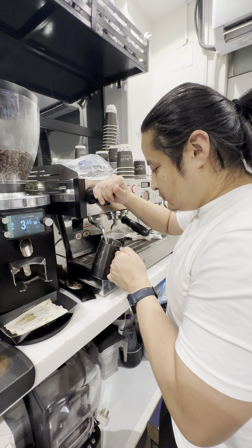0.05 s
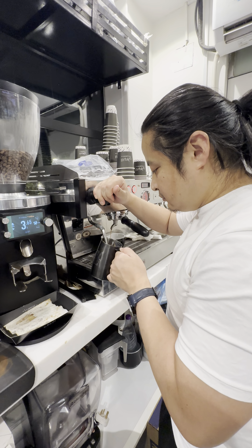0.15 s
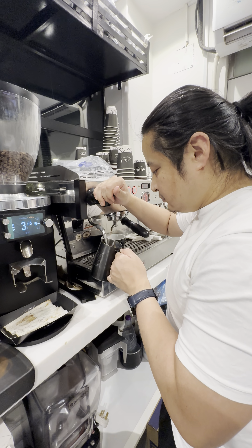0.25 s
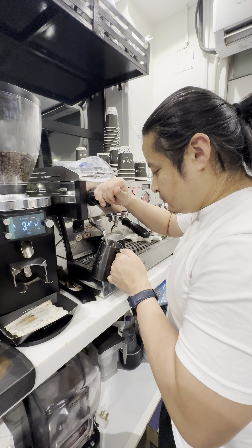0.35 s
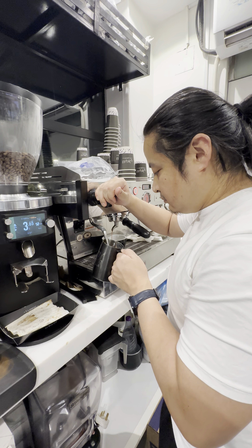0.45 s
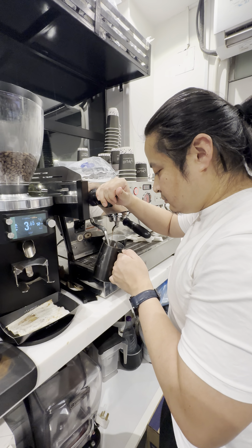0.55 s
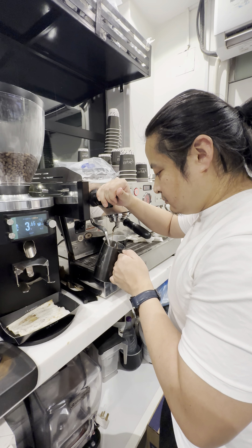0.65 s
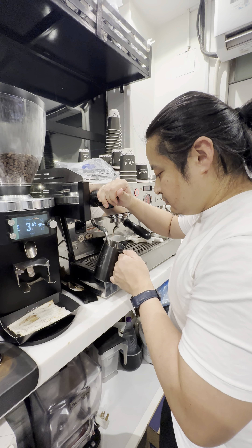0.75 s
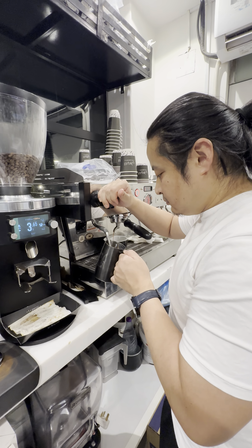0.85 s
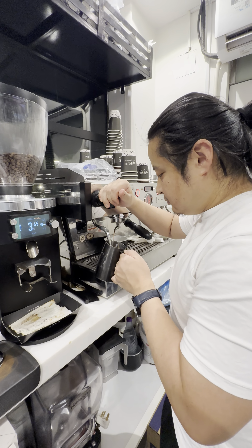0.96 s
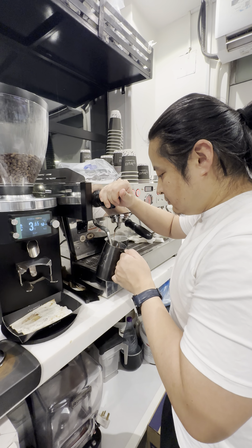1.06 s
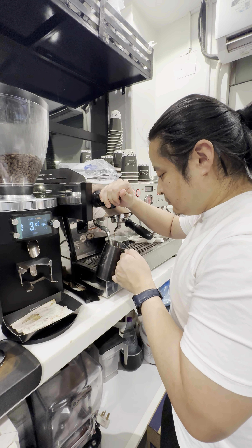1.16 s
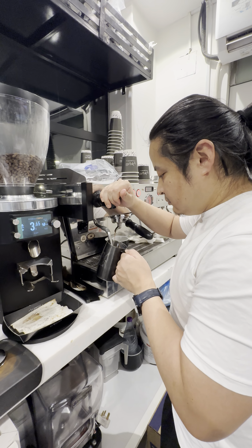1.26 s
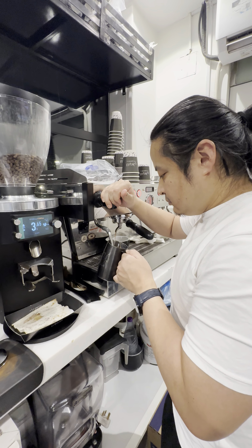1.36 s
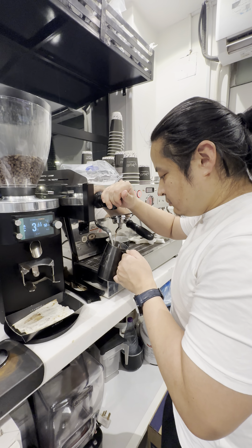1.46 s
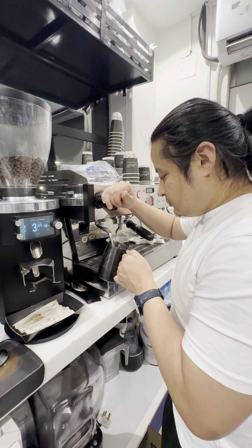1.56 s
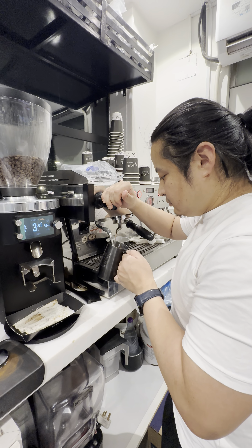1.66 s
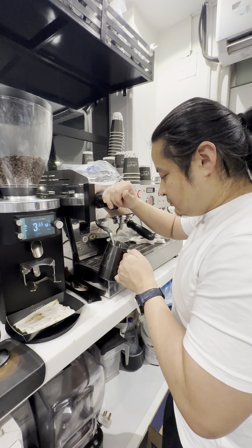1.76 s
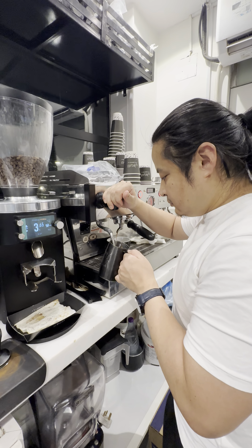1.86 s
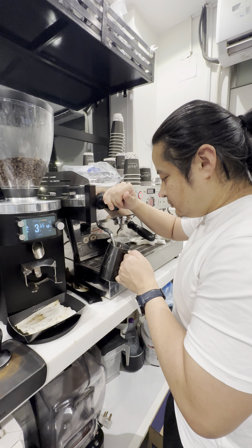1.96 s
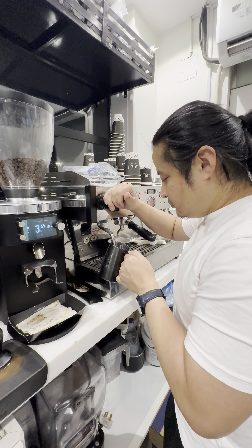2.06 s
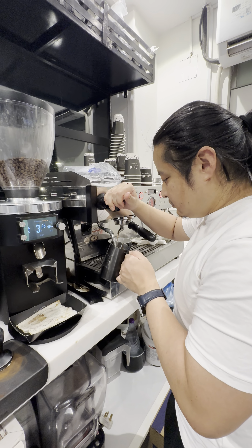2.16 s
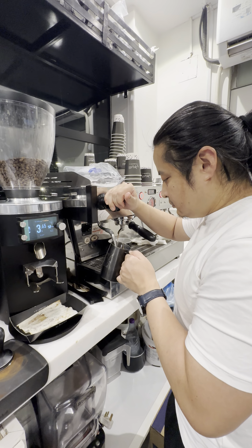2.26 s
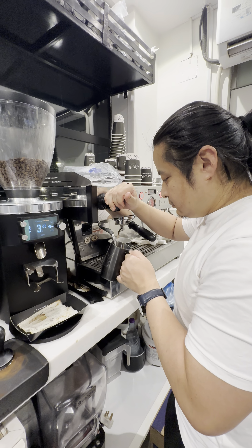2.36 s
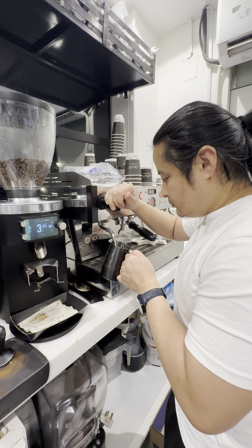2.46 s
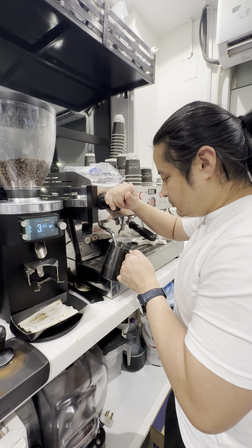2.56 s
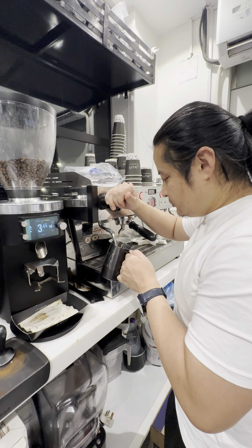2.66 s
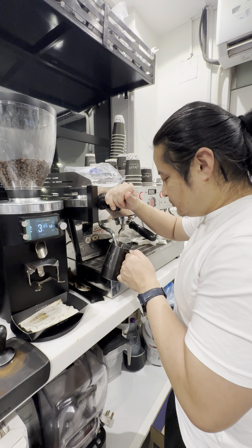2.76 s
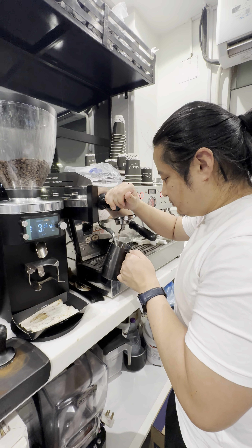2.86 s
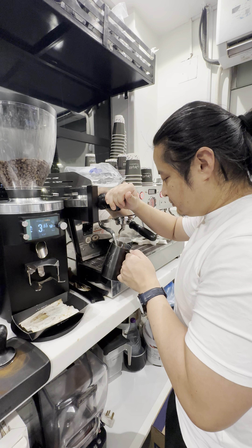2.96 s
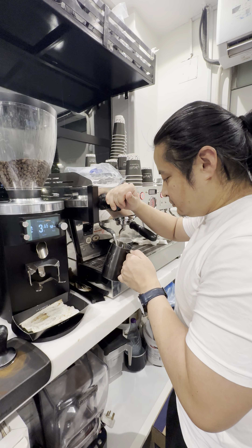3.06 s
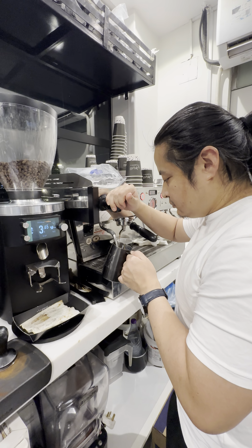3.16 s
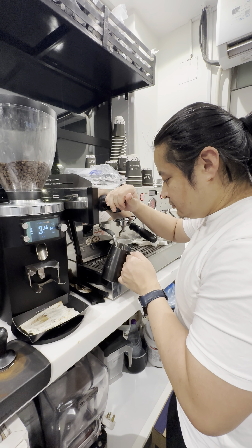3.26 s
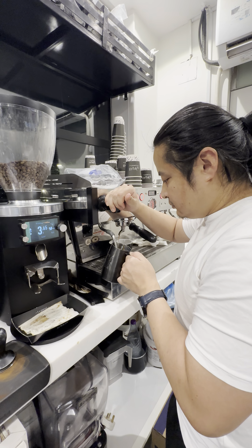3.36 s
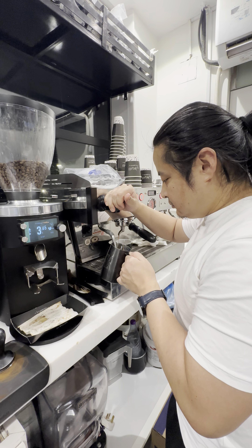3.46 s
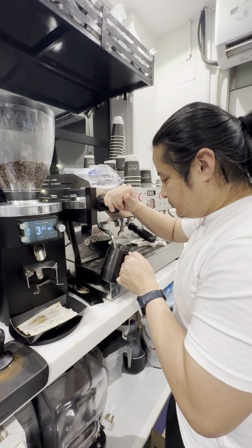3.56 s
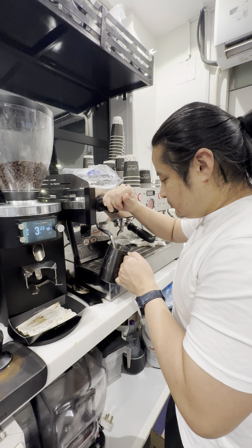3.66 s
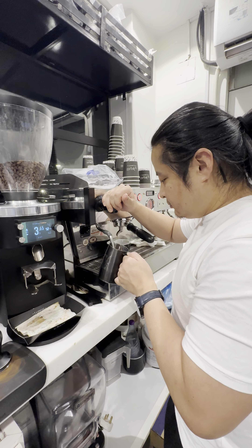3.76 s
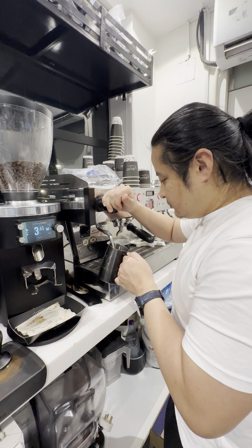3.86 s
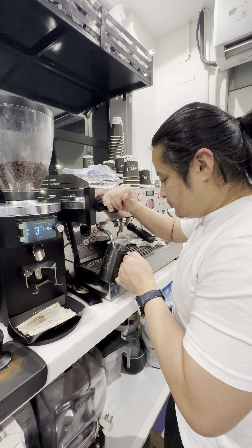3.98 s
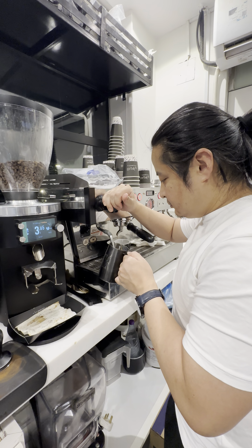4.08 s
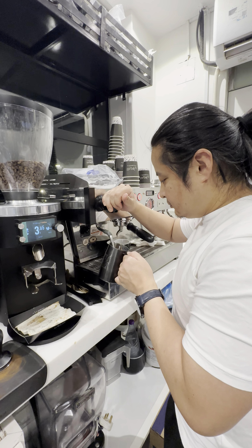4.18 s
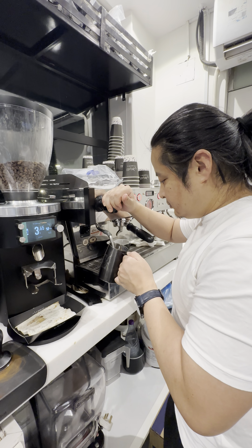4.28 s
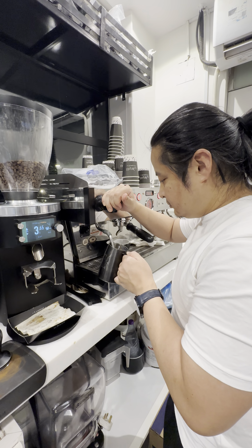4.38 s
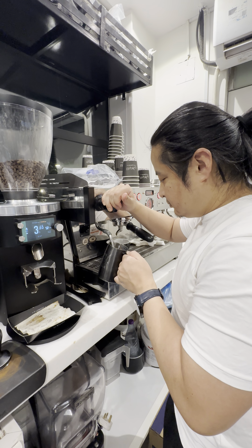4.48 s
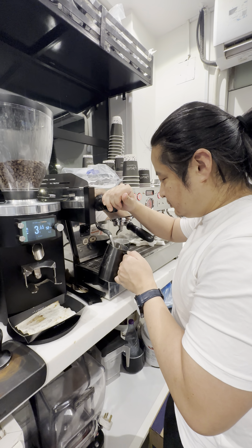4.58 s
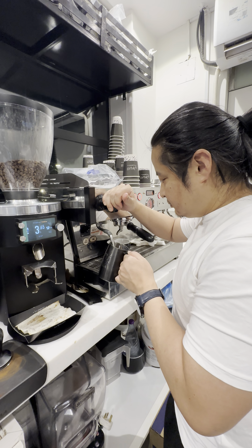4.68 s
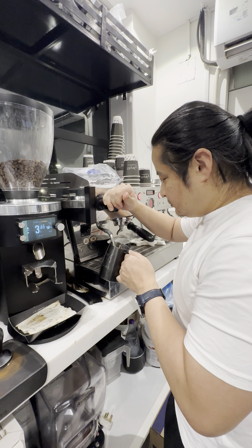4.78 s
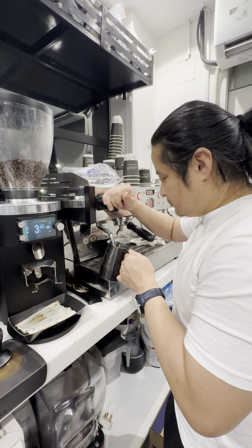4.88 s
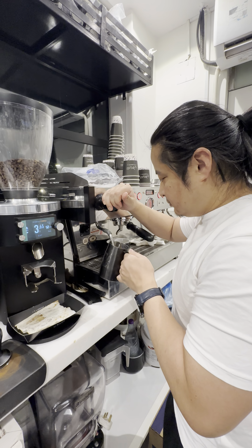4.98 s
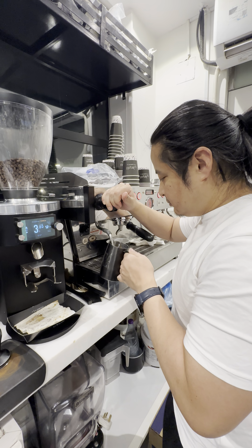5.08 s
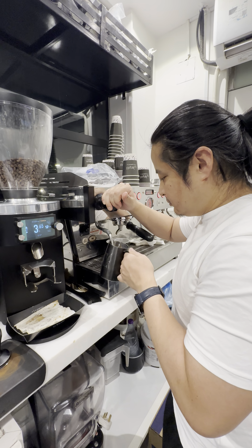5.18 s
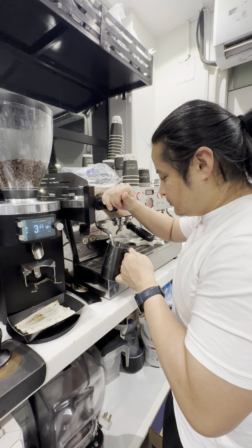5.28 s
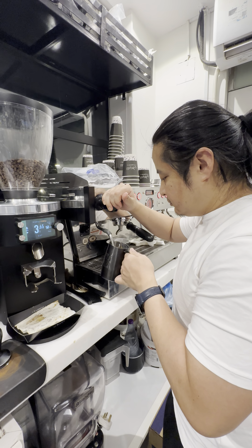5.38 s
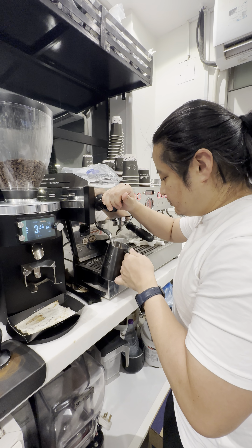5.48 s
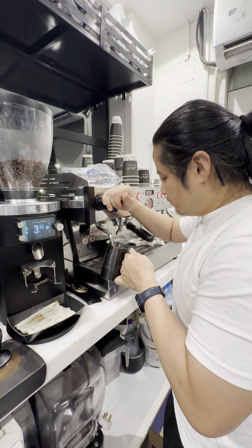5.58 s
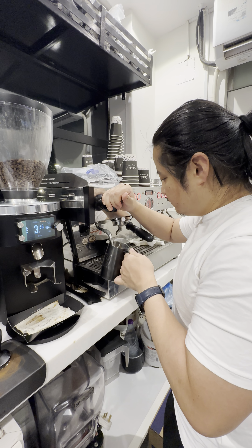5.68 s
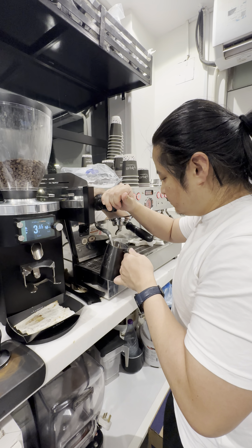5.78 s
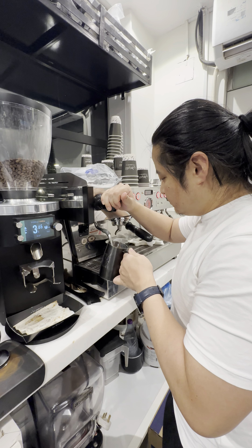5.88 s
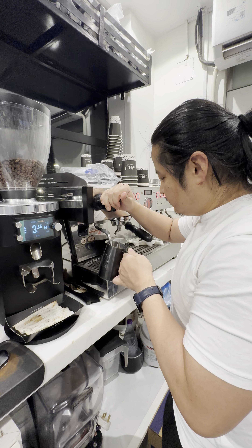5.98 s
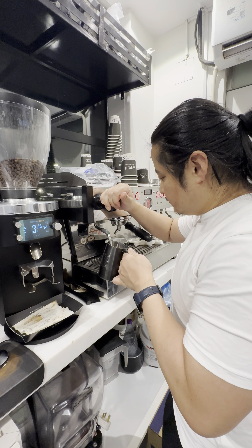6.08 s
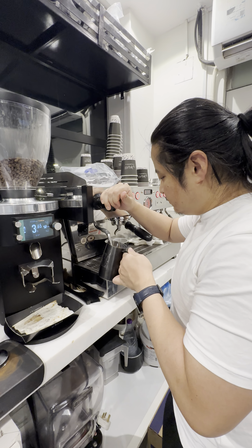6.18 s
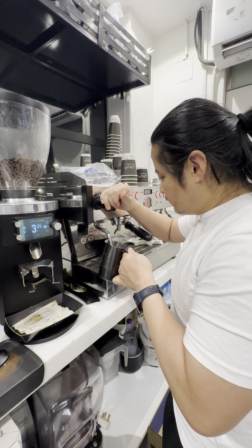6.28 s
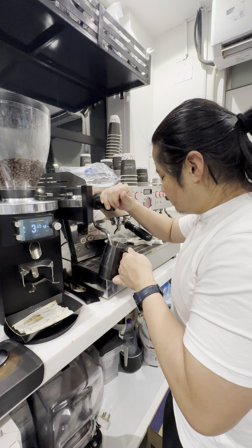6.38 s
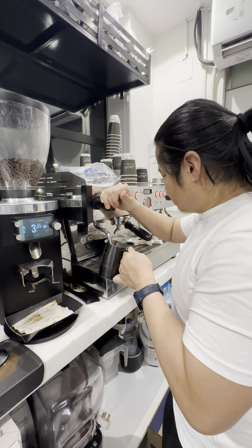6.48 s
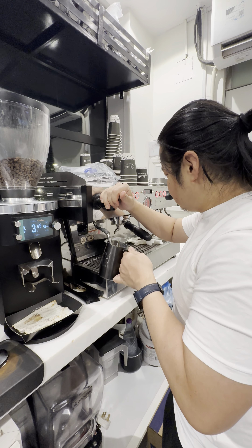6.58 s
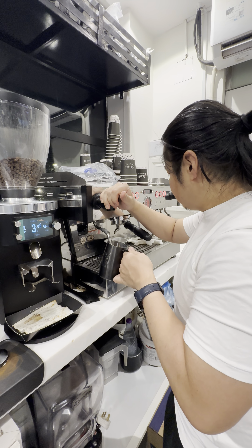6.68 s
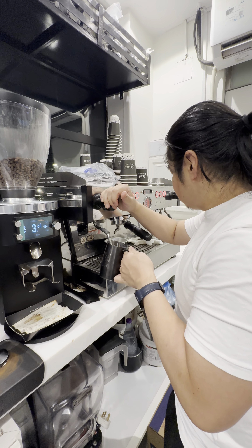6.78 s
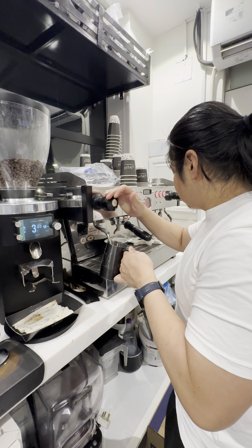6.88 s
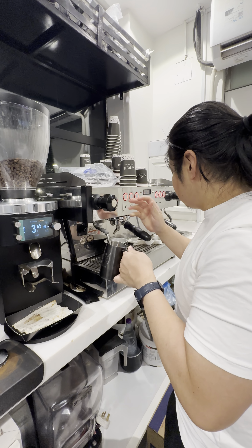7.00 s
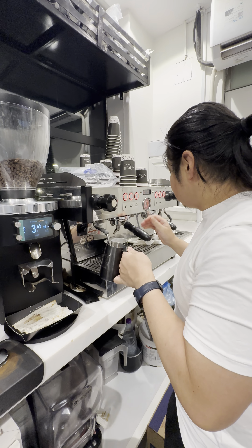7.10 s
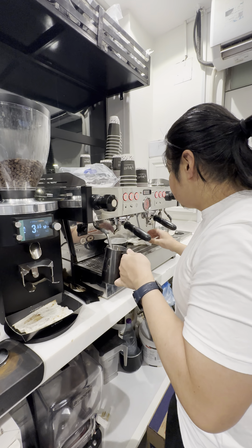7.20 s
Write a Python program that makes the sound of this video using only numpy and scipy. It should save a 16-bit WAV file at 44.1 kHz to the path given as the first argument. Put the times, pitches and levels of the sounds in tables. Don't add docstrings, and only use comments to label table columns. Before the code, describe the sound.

A phone at arm's length hears milk being steamed: sharp airy rips and wet blips first, then softer hiss dotted with gurgles, then a fuller, steady rush ringing the steel pitcher. A heavy lever clack with small rebounds ends it around seven seconds, leaving fading steam. The hard little room adds a short echo, and a low machine hum continues, one motor dropping out partway.

```python
import sys
import numpy as np
from scipy import signal
from scipy.fft import rfft, irfft, next_fast_len
from scipy.io import wavfile
from scipy.ndimage import uniform_filter1d

SR = 44100
rng = np.random.default_rng(int(sys.argv[2]) if len(sys.argv) > 2 else 0)


def magnitude_from_level(level_db):
    exponent = np.asarray(level_db, float) / 20
    return 10 ** exponent


def inscribe(sig):
    pcm = np.round(np.clip(np.atleast_2d(sig).T, -1, 1) * 32767)
    wavfile.write(sys.argv[1], SR, pcm.astype(np.int16))


N = 319284
TIME = np.arange(N) / SR
SHUT_S = 6.93

# t/s, depth in the milk [0-1], air drawn in [0-1]
TIP = [(0, 0, 1), (.5, 0.1, .9), (.95, 0.26, 0.7), (1.3, 0.1, 0.3), (2, 0, .2), (2.7, 0.08, 0.27),
       (3.1, 0, 0.2), (3.3, .55, 0.17), (3.65, .9, 0.03), (4, 1, 0.04), (7.24, 0.98, 0)]
# at the surface/dB, per air drawn/dB, per depth/dB, warming/(dB/s)
LEVEL_LAWS = [
    (-57.5, 5, -9.5, -0.7),
    (-52, 6, -4.5, 0),
    (-61, 9, 1.5, 3.5),
    (-69.5, 15.5, 16, -1.35),
]
# f/Hz, level/dB
HISS_SPECTRUM = [(1500, -19), (2500, -2.5), (4500, 0.5), (7000, -3), (9000, -4), (10500, -9.5),
                 (13000, -7.5), (16000, -6.5)]
# f/Hz, width/Hz, level re hiss/dB
EDGE_TONES = [(8750, 25, -23), (9100, 25, -19.5), (10210, 250, -15.5)]
# f/Hz, level/dB
ROLL_SPECTRUM = [(400, 1), (900, -4.5), (1500, 0.5), (2200, -2.5), (3300, -7.5), (5500, -19.5), (8000, -26),
                 (12000, -42)]
# f/Hz, width/Hz, level/dB, ring law (0 air, 1 froth, 2 jet), bubble rate/(1/s)
PITCHER_MODES = [(1290, 150, -5.5, 0, 360), (2147, 200, -3, 1, 3000), (2730, 260, -3, 1, 3000),
                 (4015, 590, -4, 2, 4000), (6130, 790, -11.5, 2, 4400)]
# t/s, peak level/dB, length/s, dullness [0-1]
SPITS = [(.095, -45, .045, 0.95), (.128, -35, 0.026, 0.15), (0.141, -28, .02, 0.08),
         (0.16, -31.5, 0.027, .45), (0.186, -26, 0.016, .02), (0.198, -40.5, .04, 0.4),
         (0.237, -32, .008, 0.27), (.252, -39, 0.031, 0.8), (.45, -55, 0.06, .95), (.486, -44, 0.026, 0.75),
         (0.563, -28.5, .01, 0.12), (0.567, -23.5, 0.047, 0.11), (0.578, -29, 0.019, 0.85),
         (0.628, -24, .016, 0), (.624, -36, 0.038, .65), (0.675, -41, .035, 1), (.839, -26.5, .004, .15),
         (.858, -47.5, .028, .6), (0.956, -49, .021, 1), (1.162, -51.5, .036, 1), (1.623, -41.5, .028, 1),
         (1.662, -50.5, .024, 1), (3.126, -47.5, .005, .95), (3.135, -47.5, .023, .6), (5.87, -62, .01, .2)]
# f/Hz, level/dB
TEARING_SPECTRUM = [(700, -19), (1000, -18), (1400, -19), (2500, -28), (4500, -8.5), (6700, -7), (8000, -7),
                    (10300, 4), (12000, 3), (14500, -3.5), (15600, 2), (16500, -15)]
# f/Hz, level/dB
FOAM_SPECTRUM = [(600, -20), (900, -1.5), (1250, 4.5), (1700, -5), (2200, -2.5), (2900, -7), (3900, 0),
                 (5000, 0.5), (7000, 0), (10000, -12), (16000, -29)]
# t/s, peak level/dB, f/Hz
GURGLES = [(0.1525, -30, 1290), (.459, -38, 1240), (.4963, -30.5, 1310), (0.555, -36, 1290),
           (0.63, -33, 1250), (0.685, -40, 1340), (.848, -37, 1280), (.9019, -35, 1450),
           (1.3419, -34, 1240), (1.376, -31, 1320), (1.6093, -41, 1400), (1.8462, -36, 1380),
           (1.967, -39, 1200), (2.003, -36, 1220), (2.0508, -35.5, 1320), (2.1473, -38, 1250),
           (2.263, -37, 1360), (2.3466, -34, 1266), (2.424, -34.5, 1260), (2.7574, -37, 1336),
           (2.81, -35, 1250), (2.844, -35, 1270), (2.96, -43, 1210), (3.054, -36, 1290),
           (3.0954, -38, 1250), (3.127, -34, 950), (3.234, -34, 1220), (3.368, -39, 1200),
           (3.5618, -34, 1260), (3.5938, -36, 1280)]
# t/s, level/dB, f of the part struck/Hz, spread/octaves, T60/s
KNOCKS = [(6.897, -37.5, 1700, .45, 0.16), (6.926, -27, 1640, 0.087, 0.055),
          (6.9345, -16.5, 1970, 0.36, 0.077), (6.9345, -20.5, 4800, .86, 0.09), (6.937, -16, 518, .12, .07),
          (6.9345, -37, 15200, .06, .16), (6.94, -24.5, 1320, .8, .3), (6.941, -23, 175, 0.33, .1),
          (6.95, -16.5, 320, .35, .13), (6.962, -22.5, 200, .3, .12), (6.962, -25, 822, .1, .16),
          (6.985, -30, 1590, 0.34, 0.16), (7.037, -27.5, 635, 0.18, 0.079), (7.085, -29, 400, .23, 0.088),
          (7.11, -39, 1190, .6, .3)]
# f/Hz, level per Hz/dB
CAFE_SPECTRUM = [(15, -32), (28, -11), (55, -1.5), (100, 0), (310, -2), (420, -4.5), (900, -15),
                 (1500, -17.5), (2200, -25.5), (3300, -37.5), (6000, -36), (9000, -58), (10300, -57),
                 (16000, -66)]
HUM_HZ = [57.7, 58.45, 93.5, 115.7, 119.8, 149.4, 177.3, 202.5, 239.9, 298.5, 347.2, 359.7, 479.5, 599.6]
# level while the second motor runs/dB, level after it stops/dB
HUM_LEVELS = [(-46.5, -45), (-47.5, -47.5), (-54, -48.5), (-41, -59), (-45, -43), (-47, -50.5),
              (-48.5, -53), (-47, -59), (-45, -45.5), (-44.5, -42), (-53, -58), (-56, -60), (-57.5, -61),
              (-54, -54)]
# f/Hz, width/Hz, level/dB
DRONES = [(58.4, 11, -50), (117, 27, -46.5), (300, 27, -48.5)]
# f/Hz, T60/s
ROOM_T60 = [(100, 0.72), (500, 0.49), (2000, 0.29), (8000, 0.26), (16000, 0.056)]
# f/Hz, sum gain/dB, difference gain/dB, share of the difference tied to the sum [0-1]
PORTS = [(25, -3.5, -27, .2), (110, -0.5, -32, .2), (263, -2.5, -23.5, .2), (514, -2.5, -8.5, .3),
         (805, 3, 0, 0.3), (1370, 0, -8, .4), (2100, 0, -12, 0.5), (3000, -1.5, 0, .5),
         (3940, 1.5, -2.5, .5), (5100, -1.5, -1, .5), (8500, -2.5, -2.5, .6), (10030, -2, 2.5, .8),
         (10880, -8.5, 5, .8), (11460, -28.5, -1, .8), (12600, -30, 1, .8), (13220, -5.5, 3, .8),
         (14400, -2.5, 3, .8), (16000, -1, -5, .8)]


def on_hz(table, size, column=1):
    rows = np.array(table)
    bins_hz = np.arange(size // 2 + 1) * SR / size
    return np.interp(np.log(bins_hz + 1), np.log(rows[:, 0]), rows[:, column])


def level(x, db):
    return x * magnitude_from_level(db) / np.sqrt(np.mean(x ** 2))


def colour(table, x=None):
    x = rng.standard_normal((2, N)) if x is None else x
    return level(irfft(rfft(x) * magnitude_from_level(on_hz(table, N)), N), 0)


def ring(x, hz, width_hz):
    return signal.lfilter(*signal.iirpeak(hz, hz / width_hz, fs=SR), x)


def walk(rate):
    hold = int(SR / rate)
    steps = np.repeat(rng.standard_normal(N // hold + 1), hold)
    return 1.38 * uniform_filter1d(uniform_filter1d(steps, hold), hold)[:N]


def grains(rate, scatter_db):
    hit = rng.random((2, N)) < rate / SR
    sign = rng.choice([-1., 1.], (2, N))
    size = np.minimum(rng.exponential(size=(2, N)), 3.5)
    return hit * sign * magnitude_from_level(scatter_db * size)


def steam():
    s, *columns = np.transpose(TIP)
    depth, air = (np.interp(TIME, s, column) for column in columns)
    warm_s = np.clip(TIME - 3.68, 0, None)
    shut_s = np.clip(TIME - SHUT_S, 0, None)
    shut_db = -10 * (1 - np.exp(-shut_s / .02)) - 20 * shut_s
    hiss_db, *rings_db = (
        db + per_air * air + per_depth * depth + per_s * warm_s + shut_db
        for db, per_air, per_depth, per_s in LEVEL_LAWS)

    jet = colour(HISS_SPECTRUM, grains(12000, 1.8))
    for hz, width_hz, db in EDGE_TONES:
        jet = jet + level(ring(rng.standard_normal((2, N)), hz, width_hz), db)
    out = magnitude_from_level(hiss_db + 3.0 + .5 * walk(12)) * jet

    flow = np.exp(-shut_s / 0.072)
    roll_db = -49 + .5 * (warm_s - 1.2) + 0.38 * walk(8)
    out = out + flow * magnitude_from_level(roll_db) * colour(ROLL_SPECTRUM)

    for hz, width_hz, db, law, rate in PITCHER_MODES:
        rung = ring(ring(grains(rate, 3.3), hz, width_hz), hz, 2 * width_hz)
        out = out + magnitude_from_level(rings_db[int(law)] + 0.97 * walk(10)) * level(rung, db)
    return out


def spits():
    bright, dull = np.zeros(N), np.zeros(N)
    for s, db, length, dullness in SPITS:
        rise = 0.27 * length
        t60 = 0.028 + .06 * dullness + 1.2 * length
        t = np.clip(TIME - s, 0, None)
        swell = np.clip(t / rise, 0, 1) ** 2
        fade = np.exp(-np.log(1000) * np.clip(t - length, 0, None) / t60)
        power = (magnitude_from_level(db) * swell * fade) ** 2
        bright = bright + (1 - dullness) * power
        dull = dull + dullness * power
    rough = magnitude_from_level(1.2 * walk(160))
    tearing = colour(TEARING_SPECTRUM, grains(7000, 2.6))
    gargle_hz, gargle_width_hz = 1300, 600
    gargle = ring(grains(500, 4.0), gargle_hz, gargle_width_hz)
    gargle = level(ring(gargle, gargle_hz, 2 * gargle_width_hz), -17)
    foam = colour(FOAM_SPECTRUM)
    return rough * (np.sqrt(bright) * tearing + np.sqrt(dull) * foam + np.sqrt(bright + dull) * gargle)


def gurgles():
    out, t = np.zeros(N), TIME[:SR // 16]
    shape = (1 - np.exp(-t / .0015)) * np.exp(-t / 0.0049)
    for s, db, hz in GURGLES:
        tone = np.sin(2 * np.pi * hz * t * (1 + 1.7 * t))
        out[int(s * SR):][:len(t)] += magnitude_from_level(db + 5.0) * shape * tone
    return np.array([out, out])


def lever():
    out, size = np.zeros((2, N + SR)), SR // 2
    t = TIME[:size]
    hz = 2 * np.arange(size // 2 + 1) + 1e-3
    rattle = rng.standard_normal((len(KNOCKS), 2, size))
    for (s, db, centre_hz, octaves, t60), noise in zip(KNOCKS, rattle):
        crowd = np.exp(-.5 * (np.log2(hz / centre_hz) / octaves) ** 2)
        modes = level(irfft(rfft(noise) * crowd, size), db)
        fade = np.clip(t * centre_hz / 0.8, 0, 1) * np.exp(-np.log(1000) * t / t60)
        blow = modes * fade
        blow = blow * magnitude_from_level(db) * np.sqrt(np.sum(fade ** 2) / np.sum(blow ** 2, axis=1, keepdims=True))
        start = int(s * SR)
        out[:, start:start + size] += blow
    return np.array([out[0, :N], 0.55 * out[0, :N] + 0.82 * out[1, :N]])


def cafe():
    out = magnitude_from_level(-35.5 + 0.96 * walk(1.456)) * colour(CAFE_SPECTRUM)
    turns = rng.random((len(HUM_HZ), 2, 1))
    turns[[1, 4]] = turns[[0, 3]]
    beat_s = 4.03
    stopped = np.clip((TIME - 3.2) / .15, 0, 1)
    for hz, (first_db, last_db), turn in zip(HUM_HZ, HUM_LEVELS, turns):
        db = first_db + (last_db - first_db) * stopped + 0.87 * walk(1.104)
        out = out + np.sqrt(2) * magnitude_from_level(db) * np.sin(2 * np.pi * (hz * (TIME - beat_s) + turn))
    for hz, width_hz, db in DRONES:
        out = out + level(ring(rng.standard_normal((2, N)), hz, width_hz), db)
    return out


def room(x, wet_db):
    size, t = next_fast_len(N + SR), np.arange(SR) / SR
    table_hz, table_t60 = np.transpose(ROOM_T60)
    tail = 0
    for hz in 63 * 2. ** np.arange(9):
        t60 = np.interp(np.log(hz), np.log(table_hz), table_t60)
        band = ring(rng.standard_normal((2, SR)), hz, 1.36 * hz)
        tail = tail + band * np.exp(-np.log(1000) * t / t60)
    tail = tail * np.clip(t / 0.0019, 0, 1) / np.sqrt(np.sum(tail ** 2) / 2)
    return x + magnitude_from_level(wet_db) * irfft(rfft(x, size) * rfft(tail, size), size)[:, :N]


def scene():
    return steam() + room(spits() + gurgles(), -5.5) + room(lever(), -3.1) + cafe()


def band_limit(x):
    return signal.sosfilt(signal.butter(12, 16820, fs=SR, output="sos"), x)


def record(dry):
    in_band = np.arange(N // 2 + 1) * SR / N < 15780
    near, other = rfft(dry) * in_band
    tied = on_hz(PORTS, N, column=3)
    mid = irfft(near * magnitude_from_level(on_hz(PORTS, N)), N)
    difference = 1j * tied * near + np.sqrt(1 - tied ** 2) * other
    side = irfft(difference * magnitude_from_level(on_hz(PORTS, N, column=2)), N)
    return band_limit(np.array([mid + side, mid - side]))


dry = scene()
out = record(dry)
inscribe(out)
```